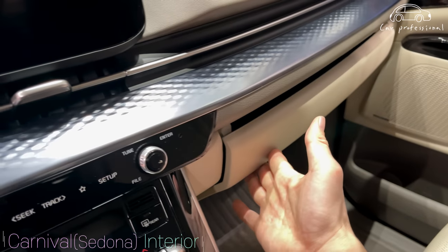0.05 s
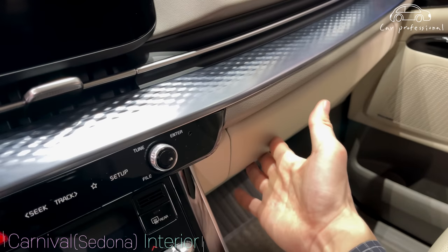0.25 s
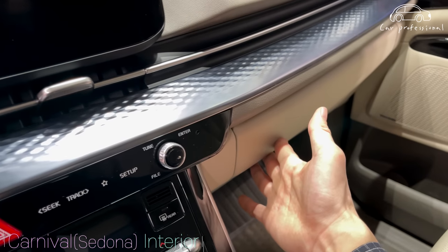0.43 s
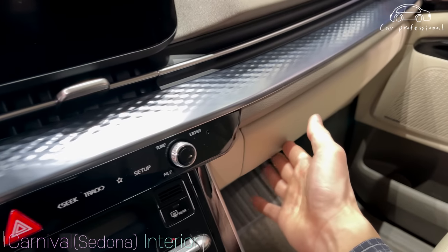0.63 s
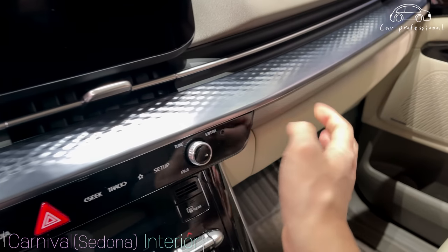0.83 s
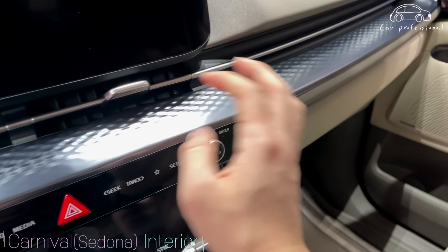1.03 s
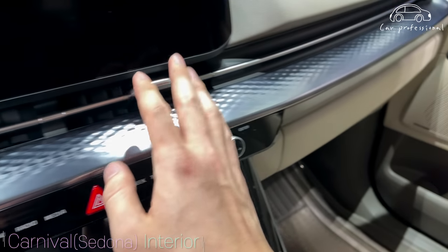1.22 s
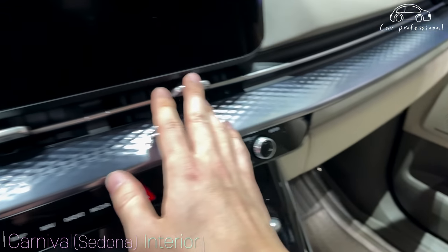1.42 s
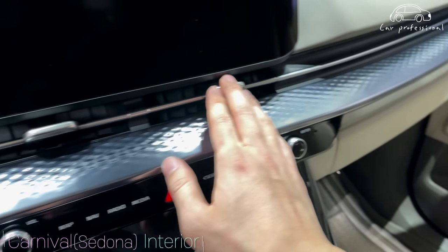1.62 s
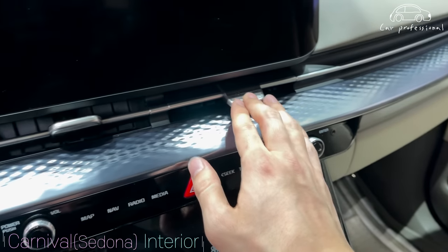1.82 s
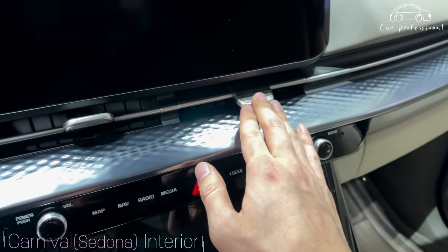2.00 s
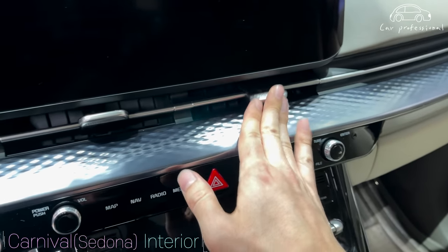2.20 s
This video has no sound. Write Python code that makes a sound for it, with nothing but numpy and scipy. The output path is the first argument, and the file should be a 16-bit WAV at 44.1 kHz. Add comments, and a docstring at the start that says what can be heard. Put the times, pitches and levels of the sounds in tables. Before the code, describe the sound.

A glovebox thumps shut inside a quiet car, then an air-vent tab clicks softly.

```python
"""A glovebox lid is pushed shut inside a quiet car: the latch rides over its catch, the lid thumps
home and the cabin booms. An arm swishes up to the dashboard, where the fingers rub over the trim
and slide a plastic air-vent tab, which ticks and knocks against its stops.
A low rumble fills the cabin throughout."""
import sys
import numpy as np
from scipy import signal
from scipy.io import wavfile

SR = 44100
rng = np.random.default_rng(int(sys.argv[2]) if len(sys.argv) > 2 else 0)


def wav_record(signal):
    """Record a signal, one row per channel, as 16-bit PCM in the file named by sys.argv[1]."""
    frames = np.transpose(np.atleast_2d(signal))
    bounded = np.clip(frames, -1, 1)
    # unit amplitude maps onto the largest positive 16-bit level
    quanta = np.round(bounded * 32767).astype(np.int16)
    wavfile.write(sys.argv[1], SR, quanta)


N = 103635
TIME_S = np.arange(N) / SR
EDGES_HZ = np.geomspace(22, 14000, 25)
CENTRES_HZ = np.sqrt(EDGES_HZ[1:] * EDGES_HZ[:-1])
PIVOT_HZ = 2000  # centre of spectral tilts


# Each row: start in seconds, box ring in dB, latch ring in dB, clatter in dB, tilt in dB per octave.
LID_CONTACTS = [(0.1415, -47, -40.5, -46.5, -5), (0.151, -36.5, -53.5, -56, -4.5),
                (0.186, -33.5, -49, -58.5, 2.5), (0.2024, -26.5, -14, -26, -4.5),
                (0.2099, -19.5, -27.5, -46, -1.5), (0.2124, -32.5, -37.5, -32, -1),
                (0.2181, -26, -26, -19, 3.5), (0.2230, -2.5, -24.5, -17.5, -0.5),
                (0.2329, -17, -40, -37, 2.5)]
# Each row: frequency in Hz, gain in dB, t60 in seconds, left minus right in dB.
BOX_MODES = [(278.4, -35.5, .22, -0.5), (318.3, -27.5, 0.19, -4), (379.5, -19, 0.1, -3),
             (487.6, -8.5, 0.062, -6.5), (569, -10.5, 0.067, 0.5), (616, -18, 0.06, -6.5),
             (837, -32, 0.044, -0.5), (1373, -13, 0.024, -3), (1437, -12, 0.036, -3.5),
             (2137, -25, 0.049, -2), (2504, -24, 0.06, -4), (3280, -40, 0.2, 1.5), (4010, -35, .09, 9.5),
             (5037, -36.5, 0.11, 4)]
LATCH_MODES = [(819, -13, 0.11, -5), (867, -14.5, 0.11, 2.5), (983, -4.5, 0.036, -1),
               (1960, -10.5, 0.026, -7), (2370, -15.5, 0.014, -6)]
# Dashboard and cabin. Each row: frequency in Hz, gain in dB, t60 in seconds, delay in seconds.
BOOM_MODES = [(56.27, -37, 1.4, .0306), (47.85, -40, 1.3, .0226), (55, -14.5, 0.16, .023),
              (95, -21, .08, .0006), (111, -21, 0.09, 0.0184), (147, -12.5, .06, 0.0137),
              (167, -24, 0.11, 0.0007)]
# Each row: frequency in Hz, relative density in dB.
CLATTER_SPECTRUM = [(100, -15), (250, -11.5), (550, -1), (900, 1.5), (1450, -8.5), (2000, -6), (3800, -7.5),
                    (6000, -17), (9000, -21.5), (12000, -24.5)]

def glovebox():
    """The latch rides over its catch, the lid strikes the hollow box and its weight booms the cabin."""
    contacts = np.array(LID_CONTACTS)
    clatter = bursts(contacts[:, [0, 3, 4]], CLATTER_SPECTRUM, attack_s=0.0013, crack_t60_s=0.035,
                     body_db=-2.5, body_t60_s=0.067, tail_db=-39, tail_t60_s=0.55)
    box = struck(contacts[:, [0, 1]], BOX_MODES, build_s=0.0069)
    latch = struck(contacts[:, [0, 2]], LATCH_MODES, build_s=0.011)
    boom = shaken(start_s=0.2, modes=BOOM_MODES, swell_s=0.012)
    return box + latch + clatter + boom


# Each row: start in seconds, housing ring in dB, tab ring in dB, snap in dB,
# tilt in dB per octave, ping in dB.
TAB_TICKS = [(1.562, -42, -70, -68, -5, -90), (1.569, -35.5, -72, -49, -2, -90),
             (1.590, -70, -35, -43.5, 1.5, -49), (1.598, -68, -43, -51.5, 0.5, -52),
             (1.646, -40, -52, -55, -2, -90), (1.696, -45, -66, -47, -3, -94),
             (1.7122, -41, -36, -45.5, 2.5, -83), (1.7172, -33.5, -46, -39.5, -6.5, -90),
             (1.7274, -57, -19.5, -31.5, 1, -44), (2.266, -45, -45, -50, -4, -90),
             (2.2822, -25, -35, -42, -4.5, -90), (2.2986, -50, -47, -41, 2, -49)]
# Each row: frequency in Hz, gain in dB, t60 in seconds, left minus right in dB.
HOUSING_MODES = [(494, -15.5, 0.068, 4), (621, -5.5, 0.035, -5), (681, 1.5, 0.029, 1.5),
                 (1296, -15, 0.033, -4), (1840, -6, 0.024, 9), (2070, -13.5, 0.036, -1)]
TAB_MODES = [(2920, 6, 0.0058, 6), (3285, 4.5, 0.0052, 12), (5520, -8.5, 0.0056, 14.5)]
PING_MODES = [(9740, 11, 0.0037, -6), (11300, 12, 0.004, -4), (13700, -7, 0.0068, 0),
              (15300, -2, 0.0056, 0)]
# Each row: frequency in Hz, relative density in dB.
SNAP_SPECTRUM = [(150, -12.5), (400, 2.5), (1200, 5), (2000, 0), (3200, -1), (5000, -8), (8500, -10.5),
                 (12000, -3.5)]
# Each row: start in seconds, level in dB.
TAB_STOPS = [(1.729, -28), (2.2969, -34)]
# Each row: frequency in Hz, gain in dB, t60 in seconds, delay in seconds.
DASH_MODES = [(106, -3.5, 0.26, 0.006), (136, -7.5, 0.09, 0.0015), (196, -9, 0.24, 0.013),
              (243, -9, 0.16, 0.012)]

def vent_tab():
    """The tab ticks along its slide, pings where it catches hard and knocks the dash at each stop."""
    ticks = np.array(TAB_TICKS)
    snaps = bursts(ticks[:, [0, 3, 4]], SNAP_SPECTRUM, attack_s=0.00019, crack_t60_s=0.021,
                   body_db=-3, body_t60_s=0.083, tail_db=-30.5, tail_t60_s=0.38)
    housing = struck(ticks[:, [0, 1]], HOUSING_MODES, build_s=0.017)
    tab = struck(ticks[:, [0, 2]], TAB_MODES, build_s=0.0034)
    pings = struck(ticks[:, [0, 5]], PING_MODES, build_s=0.0006)
    knocks = sum(from_db(db) * shaken(start_s, DASH_MODES, swell_s=0.0037) for start_s, db in TAB_STOPS)
    return housing + tab + pings + pan(0.53) * snaps + pan(2.5) * knocks


# Each row: time in seconds, level in dB.
FINGER_TOUCHES = [(0.6189, -43), (0.6437, -43.5), (0.659, -45.5), (1.018, -47), (1.5, -49.5),
                  (1.655, -42.5)]
RUB_LEVEL = [(0, -83), (.11, -53), (.16, -46), (.22, -32), (.34, -51.5), (.55, -62.5), (.7, -60),
             (1.05, -88), (1.38, -68), (1.52, -55.5), (1.62, -56), (1.71, -48.5), (1.8, -48), (2.0, -59.5),
             (2.24, -63.5), (2.35, -53)]
SWISH_LEVEL = [(0, -97), (.1, -97), (.18, -58), (.3, -102), (.58, -75.5), (.68, -60), (.86, -56.5),
               (1.05, -59.5), (1.24, -58.5), (1.4, -68), (1.7, -63), (2.02, -76), (2.13, -58), (2.22, -56),
               (2.35, -69)]
# Each row: frequency in Hz, relative density in dB.
TOUCH_SPECTRUM = [(60, -2), (130, 7.5), (250, 12), (500, 2), (900, 2), (1800, -25), (3200, -17),
                  (6000, -51), (12000, -45)]
RUB_SPECTRUM = [(40, -15), (65, -15), (90, 4.5), (130, -7), (200, -13.5), (350, -17), (650, -23.5),
                (1500, -34), (4000, -44), (12000, -50)]
SWISH_SPECTRUM = [(300, 5.5), (1000, 7.5), (1700, -2), (2600, -5.5), (4500, -10), (6500, -12), (9000, -9.5),
                  (11500, -7.5)]

def hand():
    """Fingertips rub the lid and trim and touch down softly while the sleeve swishes."""
    hits = [(start_s, db, 0) for start_s, db in FINGER_TOUCHES]
    touches = bursts(hits, TOUCH_SPECTRUM, attack_s=0.00053, crack_t60_s=0.036,
                     body_db=-12, body_t60_s=0.06, tail_db=-46, tail_t60_s=0.3)
    rub = envelope(RUB_LEVEL) * steady_noise(RUB_SPECTRUM, flicker_db=2.0)
    swish = envelope(SWISH_LEVEL) * steady_noise(SWISH_SPECTRUM, flicker_db=1.54)
    return pan(1.5) * (touches + rub + swish)


# Each row: frequency in Hz, relative density in dB.
RUMBLE_SPECTRUM = [(22, -22), (36, -6.5), (52, -7.5), (75, -8), (120, -9.5), (200, -16.5), (400, -18.5),
                   (700, -21), (1100, -21.5), (1800, -31), (3000, -52.5), (6000, -52.5), (12000, -50)]
# Each row: time in seconds, level in dB.
RUMBLE_LEVEL = [(0, -54.5), (.5, -55), (.9, -57), (1.2, -58), (1.38, -57.5), (1.6, -57), (2.0, -59.5),
                (2.35, -55.5)]
# Each row: frequency in Hz, level relative to the noise in dB.
DRONES = [(48, -2), (56, -2)]

def cabin_rumble():
    """Soft low noise with two wavering notes."""
    drone = 0
    for hz, db in DRONES:
        tone = np.sqrt(2) * np.sin(2 * np.pi * hz * TIME_S + drift(rate_hz=1.3))
        waver = 1 + 0.11 * drift(rate_hz=4)
        drone += from_db(db) * tone * waver
    noise = steady_noise(RUMBLE_SPECTRUM, flicker_db=1.86)
    return pan(0.47) * envelope(RUMBLE_LEVEL) * (noise + drone)


def struck(hits, modes, build_s, path_spread_s=0.00012):
    """Hard contacts ring a body's modes; each mode reaches the two sides by slightly different paths."""
    clicks, out = np.full(N, 1e-18), 0
    for start_s, db in hits:
        clicks[int(start_s * SR)] -= from_db(db)
    for k, (hz, db, t60_s, pan_db) in enumerate(modes):
        ring = resonate(clicks, hz, t60_s) - resonate(clicks, hz, build_s)
        lag_s = (-1) ** k * path_spread_s / 2
        sides = np.array([np.interp(TIME_S + shift_s, TIME_S, ring) for shift_s in (-lag_s, lag_s)])
        out += from_db(db) * pan(pan_db) * sides
    return out


def shaken(start_s, modes, swell_s):
    """Low modes of a large panel swell after a push, then die."""
    out = 0
    for hz, db, t60_s, delay_s in modes:
        age_s = np.maximum(TIME_S - start_s - delay_s, 0)
        swell = 1 - np.exp(-age_s / swell_s)
        out += from_db(db) * swell * fade(age_s, t60_s) * np.sin(2 * np.pi * hz * age_s)
    return out


# Near panels favour one side. Each row: frequency in Hz, left minus right in dB.
CONTACT_BALANCE = [(100, -3.5), (330, 5), (640, 7), (1200, 5), (2100, -1.5), (4000, 6.5), (7000, 3.5),
                   (12000, -0.5)]
# Each row: frequency in Hz, left-right correlation.
CONTACT_CORRELATION = [(50, .9), (130, 1), (300, 0.32), (700, 0.11), (1300, 0), (2200, 0), (12000, 0)]

def bursts(hits, spectrum, attack_s, crack_t60_s, body_db, body_t60_s, tail_db, tail_t60_s):
    """Dense plastic modes as noise: a crack, a short ring among the panels and a faint tail."""
    age_s = np.arange(SR // 2) / SR
    linger = (PIVOT_HZ / CENTRES_HZ[:, None]) ** 0.092  # low bands ring longer
    crack = fade(age_s, crack_t60_s)
    body = from_db(body_db) * fade(age_s, body_t60_s * linger)
    tail = from_db(tail_db) * fade(age_s, tail_t60_s)
    attack = 1 - np.exp(-age_s / attack_s)
    hit_power = (crack ** 2 + body ** 2 + tail ** 2) * attack ** 2
    power = np.zeros((len(CENTRES_HZ), N + SR))
    for start_s, db, tilt in hits:
        start = int(start_s * SR)
        gains = from_db(db) * band_gains(spectrum, tilt)
        power[:, start:start + len(age_s)] += gains[:, None] ** 2 * hit_power
    balance = pan(at_bands(CONTACT_BALANCE))
    return np.einsum("bn,cb,bcn->cn", np.sqrt(power[:, :N]), balance, noise_bands(CONTACT_CORRELATION))


# Each row: frequency in Hz, left-right correlation.
DIFFUSE_CORRELATION = [(50, 0.87), (130, .7), (270, 0.49), (580, -0.39), (2600, -0.0082), (6000, 0.13),
                       (12000, -0.22)]

def steady_noise(spectrum, flicker_db):
    """Diffuse noise whose bands flicker separately."""
    gains = [gain * from_db(flicker_db * drift(rate_hz=7.6)) for gain in band_gains(spectrum)]
    return np.einsum("bn,bcn->cn", gains, noise_bands(DIFFUSE_CORRELATION))


# Each row: delay in seconds, gain in dB.
PANEL_ECHOES = [(.0017, -30.5), (.0043, -27), (.0074, -16.5), (0.0116, -15.5)]

def reflected(noise):
    """Early echoes off glass and panels colour the noise."""
    echoes = (from_db(db) * np.roll(noise, int(delay_s * SR), axis=-1) for delay_s, db in PANEL_ECHOES)
    return noise + sum(echoes)


def noise_bands(correlation):
    """Stereo noise in bands of rms 1, indexed by band, channel, sample."""
    white = rng.standard_normal((2, 2, N + 4000))  # extra samples let the filters settle
    noise = low_pass(reflected(white), 12753)
    bands = []
    for k, alike in enumerate(np.clip(at_bands(correlation), -0.99, 0.99)):
        band_pass = signal.butter(2, EDGES_HZ[k:k + 2], "band", fs=SR, output="sos")
        mid, side = signal.sosfilt(band_pass, noise[k % 2])[:, -N:]
        mid, side = np.sqrt(1 + alike) * mid, np.sqrt(1 - alike) * side
        band = np.array([mid + side, mid - side])
        bands.append(band / band.std())
    return np.array(bands)


def band_gains(spectrum, tilt_db_per_octave=0):
    """Band gains of a tilted spectrum, total power 1."""
    density_db = at_bands(spectrum) + tilt_db_per_octave * np.log2(CENTRES_HZ / PIVOT_HZ)
    gains = from_db(density_db) * np.sqrt(np.diff(EDGES_HZ))
    return gains / np.linalg.norm(gains)


def at_bands(curve):
    """A frequency curve read at the band centres."""
    hz, value = np.transpose(curve)
    return np.interp(np.log(CENTRES_HZ), np.log(hz), value)


def resonate(clicks, hz, t60_s):
    """A unit click starts a decaying sine of height 1."""
    radius, angle = fade(1 / SR, t60_s), 2 * np.pi * hz / SR
    return signal.lfilter([0, np.sin(angle)], [1, -2 * radius * np.cos(angle), radius ** 2], clicks)


def drift(rate_hz):
    """Smooth random wander, standard deviation 1."""
    hop, settle = 100, 1000
    pole = np.exp(-2 * np.pi * rate_hz * hop / SR)
    white = rng.standard_normal(N // hop + settle + 2)
    slow = signal.lfilter([1], [1, -2 * pole, pole ** 2], white)[settle:]
    return np.interp(np.arange(N) / hop, np.arange(len(slow)), slow / slow.std())


def envelope(curve):
    """A level curve as gain over time."""
    return from_db(np.interp(TIME_S, *np.transpose(curve)))


def fade(age_s, t60_s):
    """Free decay, 60 dB down at t60_s."""
    return np.exp(-np.log(1000) * age_s / t60_s)


def low_pass(x, stop_hz):
    """A steep upper edge."""
    return signal.sosfilt(signal.cheby2(12, 58, stop_hz, fs=SR, output="sos"), x)


def pan(db):
    """Left and right gains for a level difference."""
    return from_db(np.array([[0.5], [-0.5]]) * db)


def from_db(db):
    """Decibels to gain."""
    return 10 ** (np.asarray(db) / 20)


def scene():
    """Everything heard from the front seat."""
    return glovebox() + vent_tab() + hand() + cabin_rumble()


def record(dry):
    """A narrow dip in the top treble and a steep upper edge soften the sound."""
    dip = signal.iirnotch(10220, Q=4.6, fs=SR)
    return low_pass(signal.lfilter(*dip, dry), stop_hz=17000)


dry = scene()
out = record(dry)
wav_record(out)
```